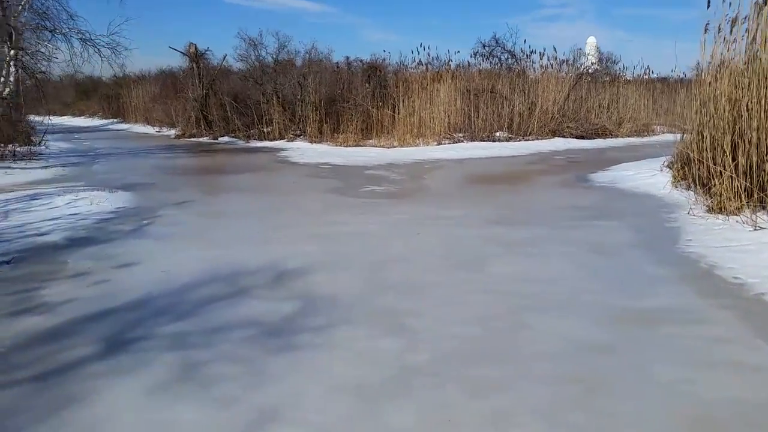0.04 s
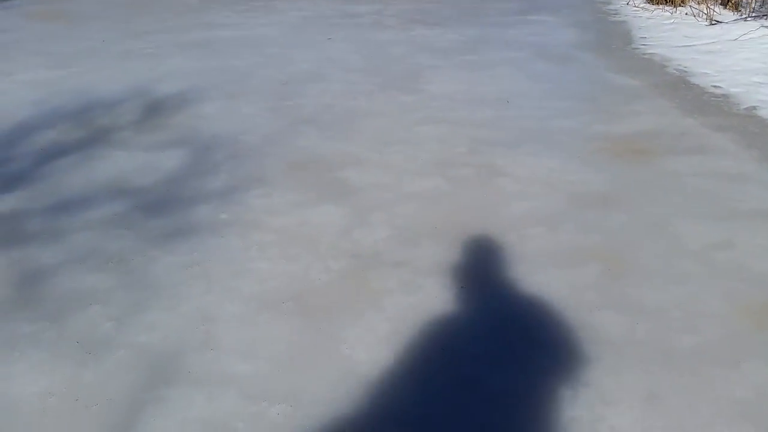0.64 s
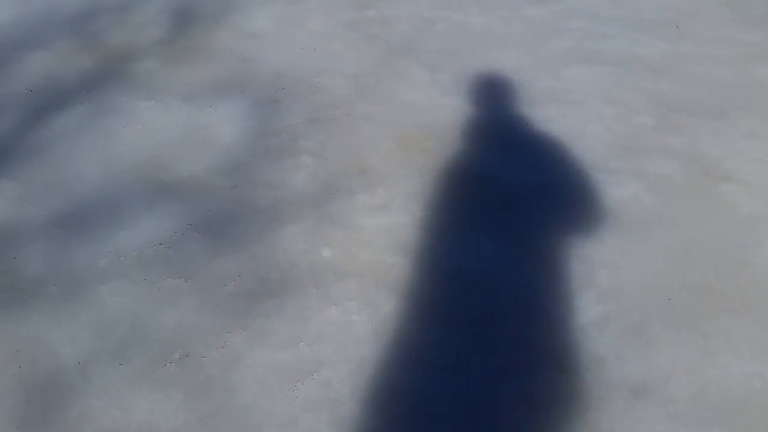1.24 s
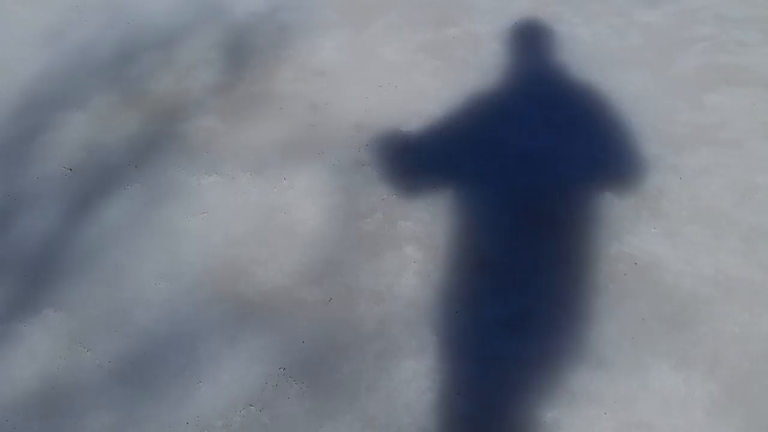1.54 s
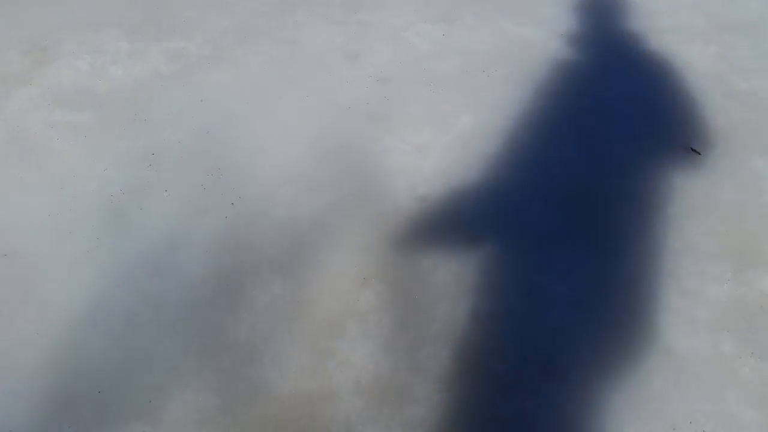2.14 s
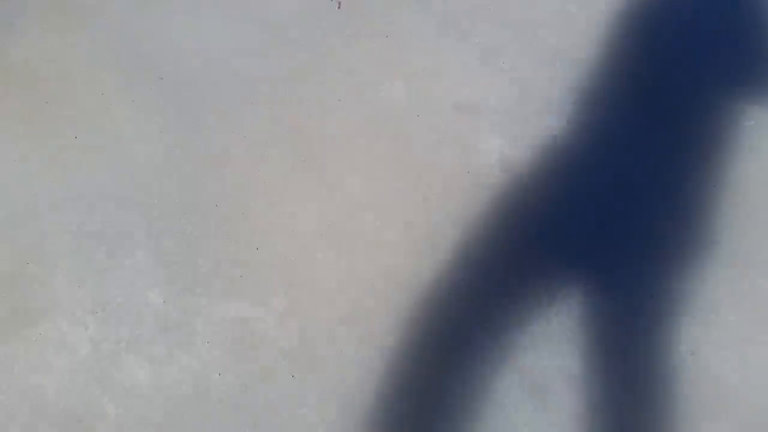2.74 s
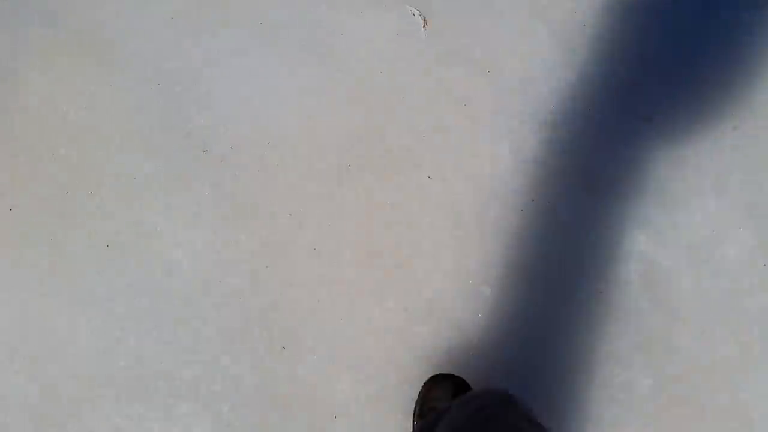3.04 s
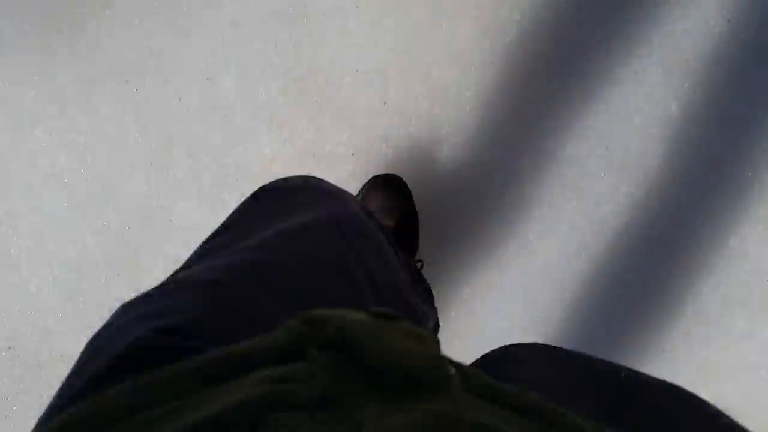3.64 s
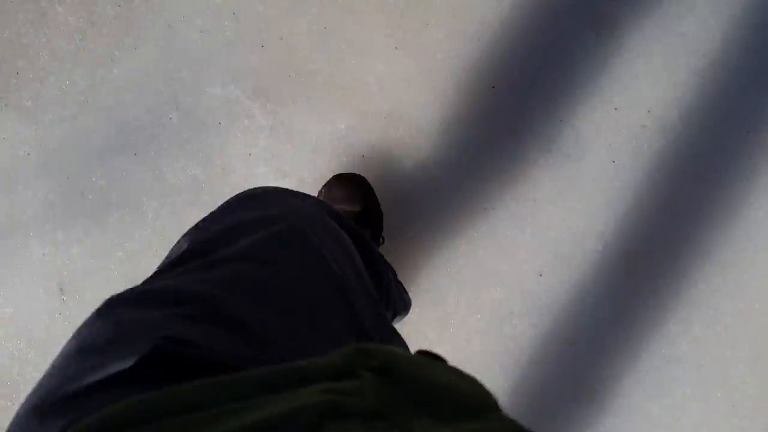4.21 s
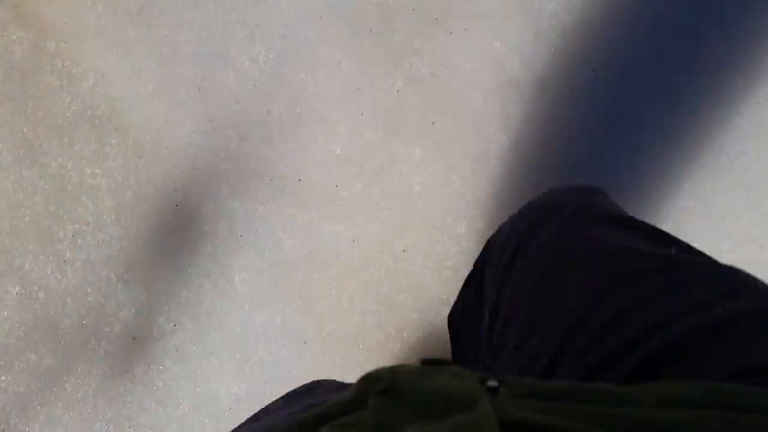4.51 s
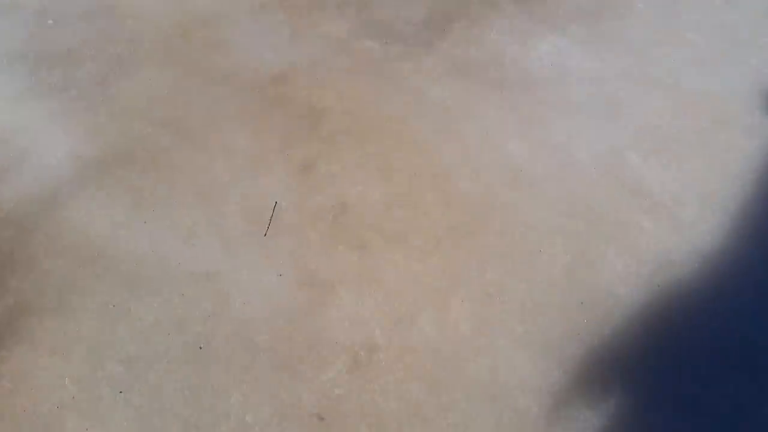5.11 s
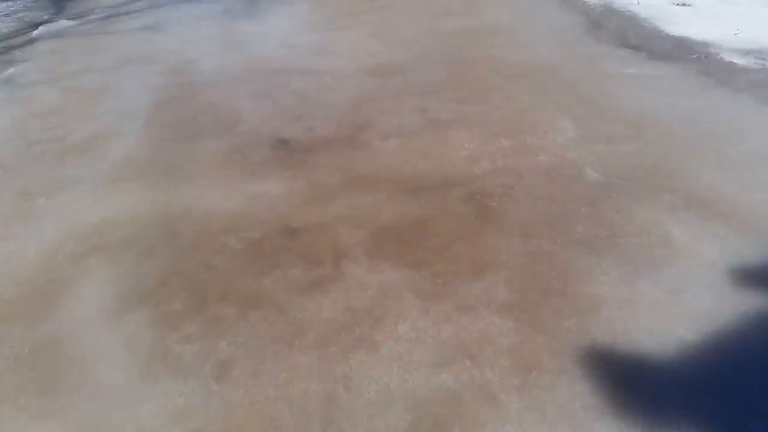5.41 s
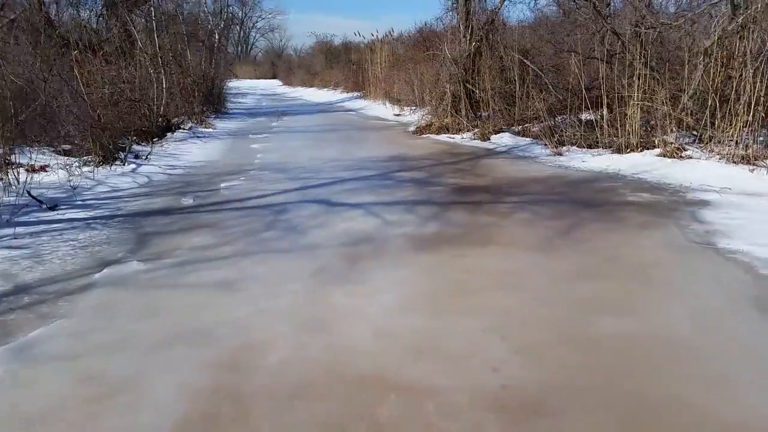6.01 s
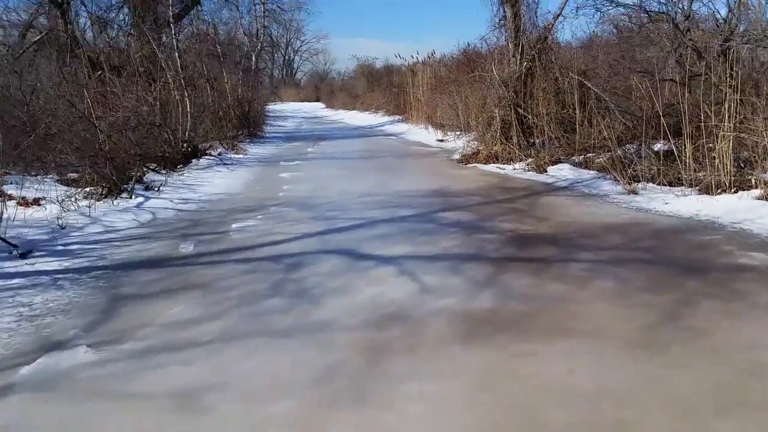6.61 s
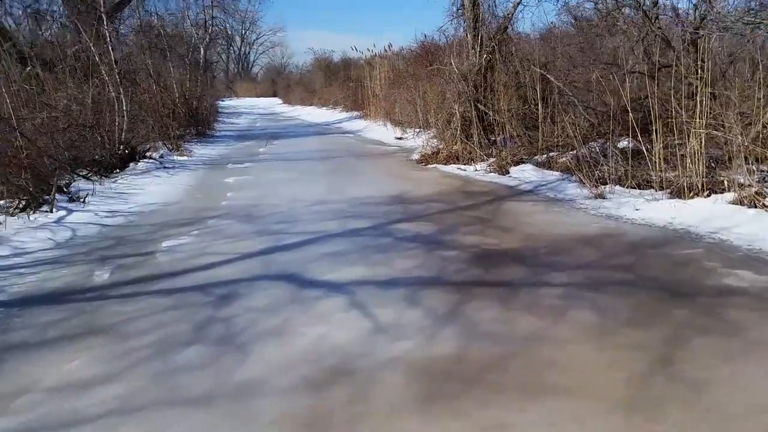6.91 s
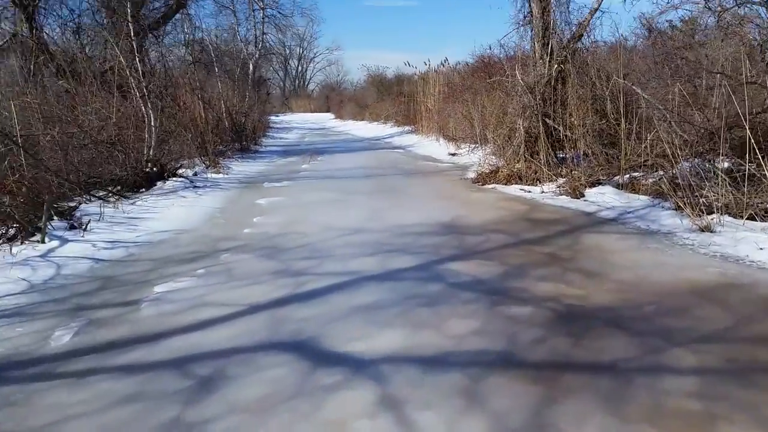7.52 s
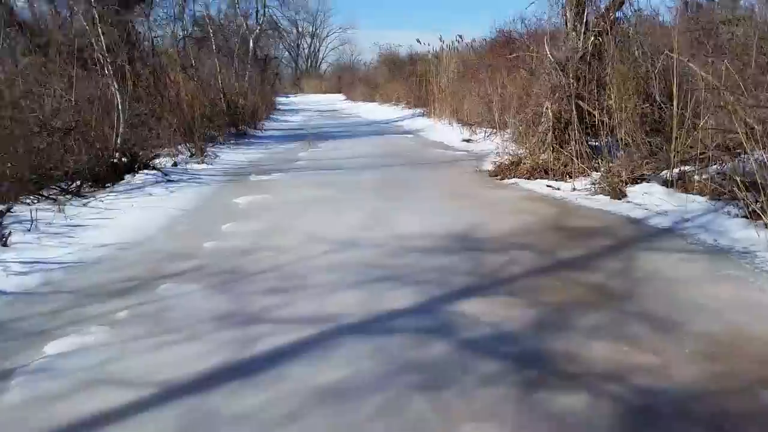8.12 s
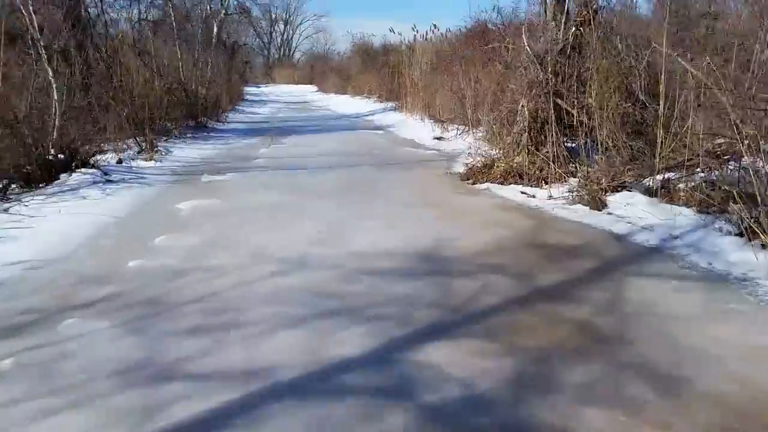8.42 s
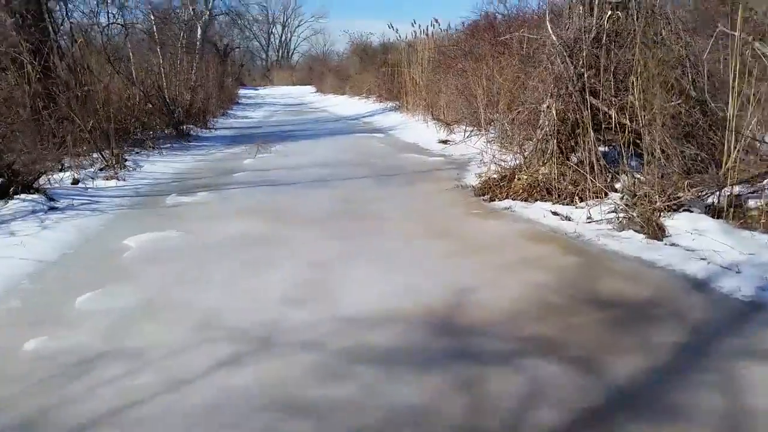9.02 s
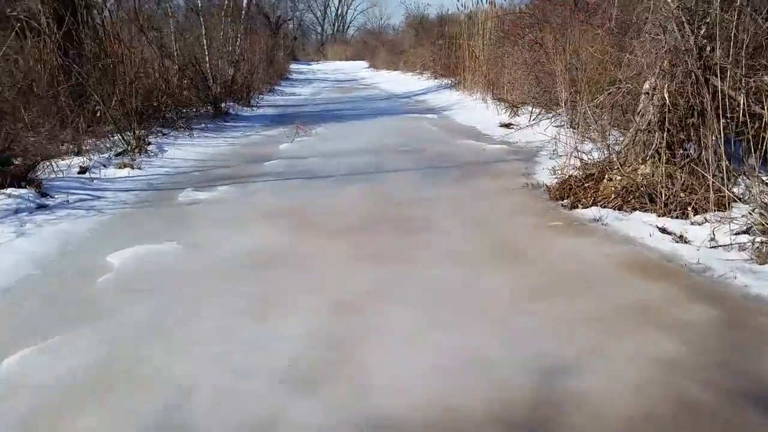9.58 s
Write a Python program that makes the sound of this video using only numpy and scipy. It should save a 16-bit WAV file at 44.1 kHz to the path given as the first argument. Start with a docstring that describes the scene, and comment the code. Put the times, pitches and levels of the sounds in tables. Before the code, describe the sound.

Shoes scrape and crunch across ice at a brisk, steady pace, with trousers swishing and wind buffeting the microphone.

```python
"""Shuffling along a frozen creek

Someone carries a camera over ice, taking nearly three strides a second. Each sole rasps off and
glides while the trouser legs swish; then it takes the weight, grinds the crust and may crush a crumb.
Wind buffets the two microphone openings (ports), over a faint rush of air and a far drone.
Midway the camera tips right down at the feet, then lifts partway, shifting the left-right balance."""
import sys
import numpy as np
from scipy import signal
from scipy.fft import rfft, irfft, next_fast_len
from scipy.io import wavfile
from scipy.ndimage import uniform_filter1d, map_coordinates

SR = 44100
rng = np.random.default_rng(int(sys.argv[2]) if len(sys.argv) > 2 else 0)


def store_wav(level_fs):
    """Save 16-bit WAV to argv[1]."""
    pcm = np.round(np.clip(np.atleast_2d(level_fs), -1, 1) * 32767)
    wavfile.write(sys.argv[1], SR, pcm.T.astype(np.int16))


N = 429975

# right and left foot in turn: push-off t/s, weight-on t/s, stop t/s,
# then relative level/dB of glide, grit, swish and weight
STRIDES = [(0.005, 0.092, 0.17, -31.5, -24, -40.5, -43), (0.309, 0.496, 0.59, -36.5, -26, -41, -34),
           (0.74, 0.875, 0.96, -31.5, -29.5, -40.5, -31), (1.084, 1.27, 1.396, -35, -28.5, -39.5, -34.5),
           (1.532, 1.654, 1.73, -33.5, -28.5, -41, -28.5), (1.88, 2.05, 2.173, -35.5, -27.5, -42.5, -30),
           (2.289, 2.411, 2.573, -31.5, -33, -41.5, -29), (2.605, 2.816, 2.924, -36, -33.5, -41.5, -30),
           (3.102, 3.187, 3.323, -31, -40, -42, -30), (3.43, 3.598, 3.693, -34.5, -24.5, -41.5, -25),
           (3.847, 3.987, 4.096, -31.5, -34, -43.5, -25.5), (4.166, 4.365, 4.46, -34.5, -25.5, -41.5, -24),
           (4.618, 4.746, 4.86, -32, -30.5, -43, -26), (4.932, 5.148, 5.22, -35, -25, -41, -26.5),
           (5.383, 5.493, 5.61, -32.5, -26.5, -39.5, -27.5), (5.68, 5.887, 5.94, -33, -20, -39.5, -30),
           (6.16, 6.239, 6.3, -27.5, -24.5, -40.5, -31), (6.443, 6.598, 6.71, -33.5, -23, -43, -34),
           (6.874, 6.98, 7.09, -31, -26.5, -42, -35), (7.197, 7.354, 7.46, -32, -25, -42.5, -40),
           (7.613, 7.745, 7.85, -30.5, -25, -42.5, -34.5), (7.942, 8.117, 8.19, -30.5, -19, -39, -30.5),
           (8.395, 8.459, 8.51, -24.5, -19, -37.5, -38), (8.645, 8.81, 8.87, -28, -19.5, -36.5, -33),
           (9.046, 9.16, 9.3, -29.5, -24, -40.5, -35.5), (9.371, 9.514, 9.68, -31.5, -22.5, -40, -32.5)]
# where the camera points: t/s, tilt (0 ahead, 1 down at the feet)
CAMERA_TILT = [(1.2, 0.77), (2.3, 0.85), (3.3, 1), (5.1, 1), (5.7, 0.61)]
# which port faces the wind: t/s, left minus right level/dB
WIND_SIDE = [(1.15, -6), (1.67, 4.5), (1.85, -8), (2.6, -7.5), (2.97, 14.5), (3.15, -11), (3.4, 11.5),
             (4.75, 9), (5.0, -4), (5.7, -7), (6.65, 7.5), (7.15, 6), (7.8, -5.5), (8.7, 6)]
# tone of breaking ice crust: f/Hz, level/dB
GRIT_TONE = [(120, -3.5), (330, 4), (600, -9), (1000, -9), (1400, 2), (1800, 1), (2150, -6.5), (2700, -24),
             (4000, -28), (9000, -40)]


def amp(db):
    """Turn decibels into a gain."""
    return 10 ** (np.asarray(db) / 20)


def unit(x):
    """Scale a signal to an average (rms) size of 1."""
    return x / np.sqrt(np.mean(x ** 2) + 1e-20)


def along(points, hz):
    """Read a table of (frequency, value) points on a log frequency axis."""
    f, values = np.transpose(points)
    return np.interp(np.log(hz + 1), np.log(f + 1), values)


def curve(points):
    """Join (time, value) points into one value per sample."""
    return np.interp(np.arange(N) / SR, *np.transpose(points))


def wobble(rate):
    """A smooth curve through `rate` random values a second."""
    knots = rng.standard_normal(int(N * rate / SR) + 4)
    coarse = np.arange(0, N, SR // 500)
    return np.interp(np.arange(N), coarse, map_coordinates(knots, [coarse * rate / SR]))


def smooth_step(u):
    """Rise smoothly from 0 to 1 as u passes zero."""
    return .5 + .5 * np.tanh(u / 2)


def hump(u):
    """A rounded peak of height 1 at u = 0."""
    return 1 / np.cosh(np.clip(u, -50, 50))


def pan(db):
    """Left and right gains that differ by db and keep the total power."""
    pair = amp(np.array([[.5], [-.5]]) * db)
    return pair / np.sqrt(np.mean(pair ** 2, axis=0))


def add(track, start_s, sound):
    """Mix a sound into a track at the given time."""
    room = track[..., max(round(start_s * SR), 0):][..., :sound.shape[-1]]
    room += sound[..., :room.shape[-1]]


def filtered(x, response):
    """Multiply each frequency in x by response(hz)."""
    size = next_fast_len(N + 8192)
    return irfft(rfft(x, size) * response(np.fft.rfftfreq(size, 1 / SR)), size)[..., :N]


def shaped(x, tone):
    """Filter x by a table of frequencies and levels."""
    return filtered(x, lambda hz: amp(along(tone, hz)))


def radiate(force, tone):
    """Turn two forces into stereo sound; the ports hear the same bass but different treble."""
    # how alike the ports sound: f/Hz, likeness (0 to 1)
    likeness = [(600, 1), (2300, 0.74), (4000, 0.068), (8000, 0.058)]

    def response(hz):
        angle = np.arccos(np.clip(along(likeness, hz), 0, 1)) / 2
        return amp(along(tone, hz)) * np.array([np.cos(angle), np.sin(angle)])
    mid, side = filtered(force, response)
    return unit(np.array([mid + side, mid - side]))


def open_air(level_db=-45.5):
    """The open air makes a faint, steady rush."""
    # tone of the rush: f/Hz, level/dB
    air_tone = [(100, 8), (850, -0.5), (1150, -3.5), (6000, -29.5), (14000, -21)]
    return amp(level_db) * radiate(rng.standard_normal((2, N)), air_tone)


def wind(gain_db=1, lump_db=2.5, stir_db=4, stir_s=0.3):
    """Swirling air presses on each port in lumps, hardest on the one facing the wind."""
    # wind strength: t/s, relative level/dB
    strength = [(0.9, -40.5), (1.15, -34.5), (1.5, -41), (1.8, -19.5), (2.05, -25), (2.8, -29.5),
                (4.8, -26.5), (5.0, -20), (5.25, -29.5), (6.25, -24.5), (7.5, -33.5), (8.7, -32.5),
                (9.65, -36)]
    # tone of the rumble: f/Hz, level/dB
    rumble_tone = [(20, -25), (45, -0.5), (100, 2), (200, -5), (300, -15), (1500, -80)]
    rumble = unit(shaped(rng.standard_normal((2, N)), rumble_tone))
    # each step pushes the lowered camera through the air, with a lull before the next
    t = np.arange(0, N, SR // 100) / SR
    pushes = sum(hump((t - plant) / stir_s) for _, plant, *_ in STRIDES)
    stir = curve(CAMERA_TILT) * np.interp(np.arange(N) / SR, t, pushes - pushes.mean())
    lumps = amp(lump_db * np.clip([wobble(24), wobble(24)], -2, 2) + stir_db * stir)
    return amp(curve(strength) + gain_db) * unit(lumps * rumble) * pan(curve(WIND_SIDE))


def far_drone(waver_db=1.3, width_hz=65):
    """A faint hollow drone from far away, perhaps traffic, heard between the steps."""
    # bands of noise in the drone: f/Hz, relative level/dB
    bands = [(375, 5), (800, 1.5), (1400, -3.5), (1830, -14)]
    # strength it wavers around: t/s, level/dB
    strength = [(1.5, -47), (3.5, -54), (6.1, -51), (8.5, -49)]
    response = lambda hz: sum(amp(db) * hump((hz - centre) / width_hz) for centre, db in bands)
    gain = amp(curve(strength) + waver_db * wobble(5))
    return gain * unit(filtered(rng.standard_normal(N), response))


def gait(loose_s=0.012, push_s=0.1, scrape_s=0.15, load_s=0.045, bite_s=0.002, grit_s=0.07):
    """The strides set how strong each kind of rubbing is over time: six loudness curves."""
    # right foot, then left: slowing time/s, lead of the swish before weight-on/s, swish width/s
    feet = [(0.046, 0.0035, 0.089), (0.039, 0.013, 0.068)]
    # the scrape is louder while the camera points down at the feet: t/s, relative level/dB
    near_feet = [(1.2, -10.5), (2.4, -3.5), (3.6, 4), (4.7, 4.5), (5.7, -9.5)]
    track, t = np.zeros((6, N)), np.arange(3 * SR // 4) / SR
    for i, (start, plant, stop, glide_db, grit_db, swish_db, weight_db) in enumerate(STRIDES):
        slowing_s, swing_lead_s, swing_s = feet[i % 2]
        first = max(start - .2, 0)
        now = first + t
        loose = smooth_step((now - start) / loose_s)
        glide = amp(glide_db) * loose
        # the legs pass each other fastest just before the weight comes on
        swing = hump((now - plant + swing_lead_s) / swing_s)
        # the cloth starts later and more softly than the sole; tanh rounds its peak
        cloth_onset = smooth_step((now - start - 0.0091) / 0.018)
        cloth = amp(swish_db) * cloth_onset * np.tanh(1.23 * swing)
        # the same swing sends the lightly loaded sole skating over the ice
        scrape_db = swish_db + np.interp(start, *np.transpose(near_feet))
        push = amp(scrape_db - 7) * loose * hump((now - start) / push_s)
        scrape = amp(scrape_db) * loose * hump((now - plant + 0.006) / scrape_s)
        # the weight comes on smoothly, but the tread bites at once, holds a moment and lets go
        load = amp(weight_db) * hump((now - plant - 0.022) / load_s)
        letting_go = np.exp(-(np.maximum(now - plant, 0) / grit_s) ** 1.2)
        grit = amp(grit_db) * smooth_step((now - plant) / bite_s) * letting_go
        # the foot comes to rest; the cloth settles more slowly
        moving = smooth_step((stop - now) / slowing_s)
        settling = smooth_step((stop - now) / (2 * slowing_s))
        sole = moving * np.array([glide, scrape, load, grit, push])
        add(track, first, np.vstack([settling * cloth, sole]))
    return track


def slips(rate, spread_db, smooth):
    """Friction: about `rate` tiny slips a second, of scattered size, over smooth rubbing."""
    happens = rng.random(N) < rate / SR
    sizes = amp(spread_db * np.clip(rng.standard_normal(N), -2, 2))
    snaps = unit(happens * sizes * rng.choice([-1, 1], (2, N)))
    return snaps + smooth * rng.standard_normal((2, N))


def patchy(x, depth_db):
    """Resonances come and go as the contact shifts."""
    spectra = signal.stft(x, nperseg=512)[2]
    patches = rng.standard_normal(spectra.shape[1:])
    patches = uniform_filter1d(patches, size=6, axis=0)  # blur across frequency
    patches = uniform_filter1d(patches, size=12, axis=1)  # blur across time
    return signal.istft(spectra * amp(depth_db * unit(patches)), nperseg=512)[1][:, :N]


def toe_rasp(push, band_hz=(2500, 4000)):
    """The toe pushes off over sharp frost with a bright rasp."""
    friction = slips(rate=1500, spread_db=4.5, smooth=0.4)
    return push * unit(signal.lfilter(*signal.butter(3, band_hz, "bandpass", fs=SR), friction))


def sole_slide(glide, scrape, load, uneven_db=0.97):
    """Rubber on frosted ice: bright while it skates, dull and full once it carries the weight."""
    # tone of the gliding sole: f/Hz, level/dB
    glide_tone = [(200, 1), (1100, 1), (1600, -3.5), (2300, -10), (3200, -36), (6000, -55)]
    # tone of the scrape: f/Hz, level/dB
    scrape_tone = [(1500, -36), (2400, 1), (3150, 0), (5000, -9), (6500, -25.5), (9500, -6.5), (12000, -12),
                   (14700, -33)]
    # tone of the sole under weight: f/Hz, level/dB
    load_tone = [(120, 4), (280, 5), (700, 1.5), (1050, -4), (1500, -10.5), (2200, -37), (4000, -31)]
    glide_force = patchy(slips(rate=1800, spread_db=3, smooth=0.69), depth_db=2.5)
    scrape_force = patchy(slips(rate=3000, spread_db=3.5, smooth=0.32), depth_db=1.5)
    load_force = slips(rate=900, spread_db=3.5, smooth=0.5)
    gliding = amp(-0.5) * glide * radiate(glide_force, glide_tone)
    skating = scrape * radiate(scrape_force, scrape_tone)
    loaded = amp(1.5) * load * radiate(load_force, load_tone)
    # the sole crosses rougher and slicker patches
    return (gliding + skating + loaded) * amp(uneven_db * wobble(25))


def trouser_swish(speed, gain_db=3.5, fold_db=1.8, snag_share=0.097):
    """Trouser cloth rubs on itself: a soft rasp and high hiss that flutter as the folds pass."""
    # tone of the cloth: f/Hz, level/dB
    cloth_tone = [(1500, 8), (2600, 12), (3700, -3.5), (6500, -4.5), (7500, -9.5), (8500, -0.5), (9700, 8),
                  (11000, 2.5), (13000, 2), (14700, -9)]
    rub = speed * amp(fold_db * wobble(40))
    # single threads catch and let go
    snags = snag_share * speed * slips(rate=120, spread_db=3, smooth=0)
    weave = rub * unit(slips(rate=6000, spread_db=5, smooth=0.55))
    return amp(gain_db) * np.sqrt(np.mean(rub ** 2)) * radiate(weave + snags, cloth_tone)


def judder(rate, scatter):
    """The tread sticks and slips about `rate` times a second, with one pulse each time."""
    gaps, sizes = rng.standard_normal((2, SR))
    at = (np.cumsum(np.exp(scatter * gaps)) / rate * SR).astype(int)
    return unit(np.bincount(at[at < N], np.tanh(sizes[at < N]), N))


def ice_grind(grit, dust=0.54):
    """The tread grinds the ice crust into coarse grains, with finer dust between them."""
    grains = judder(rate=420, scatter=0.55)
    force = np.array([grains, rng.standard_normal(N)]) + dust * rng.standard_normal((2, N))
    return grit * radiate(patchy(force, depth_db=1.8), GRIT_TONE)


def wind_flutters(lump_db=3):
    """Small swirls of air come off the camera's edges and flutter above the rumble."""
    # gusts: t/s, half width/s, level/dB
    gusts = [(0.27, 0.02, -36), (1.059, 0.02, -37), (2.27, 0.079, -25.5), (2.963, 0.0083, -26),
             (3.9, 0.009, -22.5)]
    # tone of the flutter: f/Hz, level/dB
    flutter_tone = [(100, -21), (220, 1), (420, -9.5), (650, -31), (1500, -61)]
    t = np.arange(N) / SR
    strength = sum(amp(db) * hump((t - s) / width) for s, width, db in gusts)
    swirls = shaped(rng.standard_normal((2, N)), flutter_tone)
    return strength * unit(swirls * amp(lump_db * wobble(40)))


def ice_crumbs(snap_db=17, debris_db=-2, fade_s=0.025):
    """A crumb of ice bursts under the sole: one sharp snap, then a short crunch of debris."""
    # crushed crumbs: t/s, relative level/dB
    crumbs = [(0.376, -36), (0.497, -24), (0.876, -23), (2.631, -29), (2.841, -32), (3.451, -32),
              (4.371, -22.5), (5.372, -34), (5.898, -27), (7.318, -26), (7.385, -26), (7.42, -21.5),
              (8.117, -12.5), (8.126, -19), (9.229, -19), (9.262, -26.5), (9.521, -19.5), (9.537, -13)]
    snaps, bursts, t = np.zeros(N), np.zeros(N), np.arange(SR // 10) / SR
    fade = np.exp(-np.log(1000) * t / fade_s)  # down 60 dB after fade_s
    for s, db in crumbs:
        snaps[round(s * SR)] = amp(db + snap_db)
        add(bursts, s, amp(db + debris_db) * fade)
    debris = bursts * radiate(rng.standard_normal((2, N)), GRIT_TONE)
    return shaped(snaps, GRIT_TONE) + debris


def clothes_ticks(band_hz=(8000, 12500), fade_s=0.0094):
    """Tiny hard parts of the clothes touch, like a zip pull against its slider."""
    # ticks: t/s, relative level/dB
    ticks = [(0.408, -31), (1.491, -39), (1.855, -37), (3.307, -25), (4.925, -24), (4.949, -21),
             (9.26, -27)]
    track, t = np.zeros((2, N)), np.arange(SR // 20) / SR
    fade = np.exp(-np.log(1000) * t / fade_s)
    for s, db in ticks:
        add(track, s, amp(db) * fade * rng.standard_normal((2, len(t))))
    return signal.lfilter(*signal.butter(1, band_hz, "bandpass", fs=SR), track)


def wind_thumps(centre_hz=112, swell_s=0.016, one_sided=1.8):
    """A swirl of air hits the port facing the wind: a few low cycles that swell and die."""
    # thumps: t/s, peak level/dB before panning
    thumps = [(1.13, -25.5), (1.653, -15.5), (1.79, -9.5), (1.875, -14), (1.929, -12.5), (2.952, -12.5),
              (3.054, -12), (3.114, -16.5), (3.615, -13.5), (3.89, -14), (4.184, -15.5), (4.76, -14),
              (4.962, -13.5), (5.0, -8.5), (5.766, -21), (5.905, -16.5), (6.674, -12.5), (7.12, -14.5),
              (7.212, -18.5), (7.9, -20), (8.555, -22.5), (8.685, -16.5), (8.91, -18), (9.133, -19),
              (9.339, -16.5), (9.414, -18.5)]
    track, t = np.zeros((2, N)), np.arange(SR // 8) / SR
    swell = (t / swell_s * np.exp(1 - t / swell_s)) ** 2
    for s, db in thumps:
        side_db = one_sided * np.interp(s + swell_s, *np.transpose(WIND_SIDE))
        pitch, phase, bend = rng.standard_normal((3, 2, 1))
        detune = np.exp(.2 * pitch + .15 * bend * np.tanh(t / swell_s - 1))
        cycles = np.sin(2 * np.pi * centre_hz * detune * t + phase)
        add(track, s, amp(db) * pan(side_db) * swell * cycles)
    return track


def camera_shade(sound, facing_db=0.49):
    """The camera body shades each port differently as it tilts."""
    # balance when pointing ahead: f/Hz, left minus right level/dB
    ahead_balance = [(500, -2.5), (800, 0.5), (1500, -20.5), (2500, -11), (3800, 34), (5700, -14),
                     (7300, 1), (8400, 42), (10000, -2), (13000, -3)]
    # balance when pointing at the feet: f/Hz, left minus right level/dB
    down_balance = [(700, -2.5), (1200, -5.5), (1850, -3.5), (3300, -6.5), (5000, -2), (7000, -4),
                    (8400, 12.5), (13000, 9.5)]
    # the treble reaches the left port first: f/Hz, phase lead/rad
    left_lead = [(900, .1), (1950, 1.2), (3100, 2.32)]

    def pose(balance, hz):
        phase = along(left_lead, hz) / 2
        return pan(along(balance, hz)) * np.exp(1j * np.array([phase, -phase]))
    ahead = filtered(sound, lambda hz: pose(ahead_balance, hz))
    down = filtered(sound, lambda hz: pose(down_balance, hz))
    tilt = curve(CAMERA_TILT)
    return (1 - tilt) * ahead + tilt * amp(facing_db) * down


def scene():
    """Strides on ice in the open air, with a far drone and wind on the ports."""
    cloth, glide, scrape, load, grit, push = gait()
    air = open_air()
    shoes = sole_slide(glide, scrape, load) + toe_rasp(push) + ice_grind(grit) + ice_crumbs()
    clothes = trouser_swish(cloth) + clothes_ticks()
    return camera_shade(shoes + clothes + air) + far_drone() + wind() + wind_thumps() + wind_flutters()


def record(dry):
    """The camera cuts off the highest treble steeply."""
    top_hz = 14650
    return filtered(dry, lambda hz: 1 / (1 + (hz / top_hz) ** 200))


dry = scene()
out = record(dry)
store_wav(out)
```